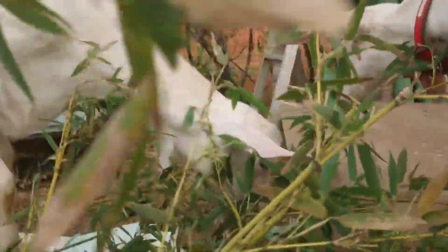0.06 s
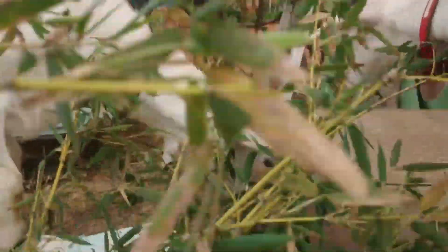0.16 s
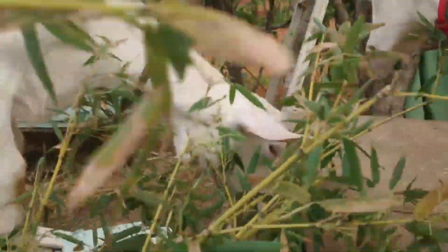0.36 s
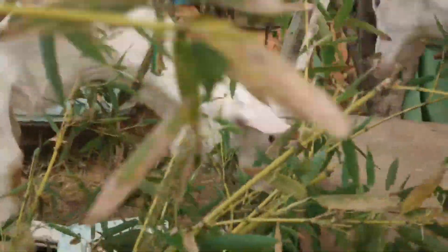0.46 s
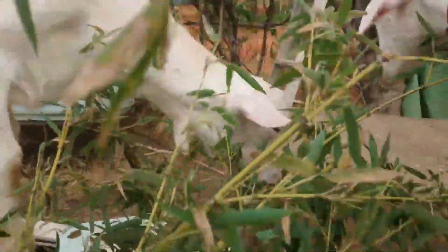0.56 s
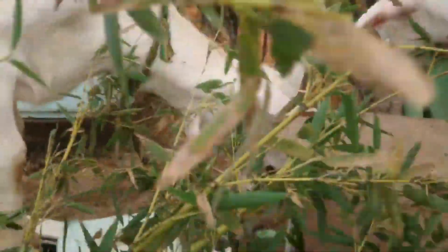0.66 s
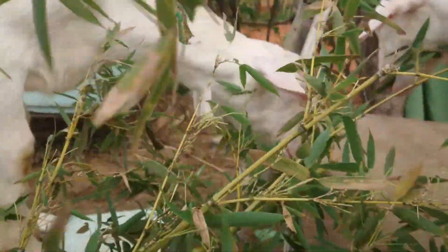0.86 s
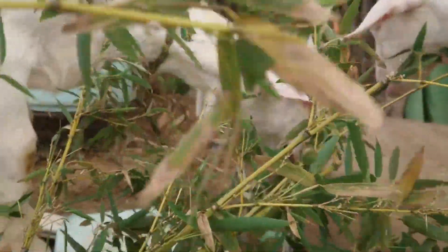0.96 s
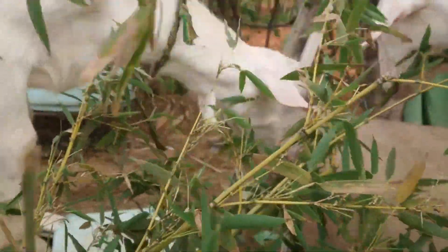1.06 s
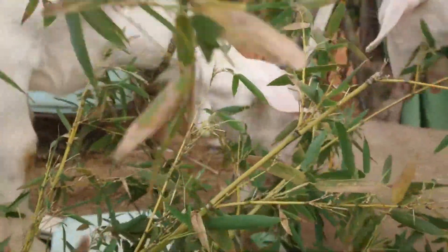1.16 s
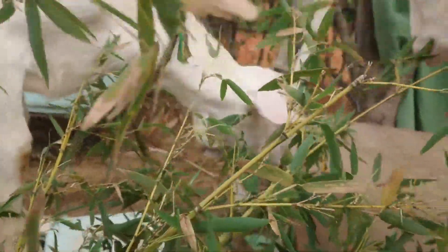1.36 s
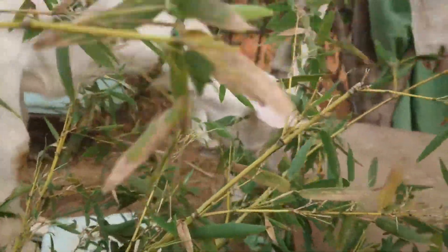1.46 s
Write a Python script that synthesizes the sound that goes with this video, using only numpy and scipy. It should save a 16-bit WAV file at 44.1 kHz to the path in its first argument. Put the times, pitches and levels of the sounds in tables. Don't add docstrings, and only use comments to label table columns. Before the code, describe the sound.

Bamboo leaves tear and rustle in uneven tugs, one thick stem cracking hard, over low outdoor rumble

```python
import sys
import numpy as np
from scipy import signal
from scipy.fft import rfft, irfft
from scipy.io import wavfile

SR = 44100
rng = np.random.default_rng(int(sys.argv[2]) if len(sys.argv) > 2 else 0)


def makeup_ratio(level_db):
    decades = np.asarray(level_db, float) / 20
    return 10 ** decades


def unload_audio(sound):
    columns = np.transpose(np.atleast_2d(sound))
    steps = np.round(np.clip(columns, -1, 1) * 32767)
    wavfile.write(sys.argv[1], SR, steps.astype(np.int16))


N = 66150

# hz, level_db
RUMBLE_COLOUR = [(15, -24), (25, -4), (71, 3), (273, -5), (337, -12.5), (743, -14), (1540, -13),
                 (1730, -13.5), (2500, -15.5), (3250, 2), (5500, -120)]
# hz, likeness_0_to_1
LIKENESS = [(60, 1), (300, 0.93), (700, 0.76), (1400, 0.13), (3000, 0.051), (8000, 0.02)]
# time_s, level_db
TUG = [(0, -45.5), (.2, -46), (.225, -42.5), (0.281, -37.5), (0.426, -38.5), (.47, -45), (0.612, -42.5),
       (0.666, -36), (0.701, -31.5), (0.744, -36), (0.782, -34), (0.848, -40.5), (.93, -44.5),
       (1.07, -45.5), (1.11, -41.5), (1.2, -47.5), (1.3, -45), (1.39, -47.5)]
# hz, level_db_per_hz
LEAF_COLOUR = [(200, 0), (400, -6), (800, -10), (1700, -11.5), (2500, -0.5), (5000, -2), (10000, -7),
               (16500, -7)]
# start_s, peak_db, colour_hz, brightness_db, t60_s
SNAPS = [(.2165, -25, 14600, -3, 0.0087), (.2303, -20, 9600, 9, 0.0092), (.2910, -12, 9000, 6.5, .014),
         (.525, -24.5, 8440, -13, 0.011), (.594, -28, 13000, -3.0, 0.013), (.6945, -14.5, 7900, 15, 0.016),
         (.867, -25, 14000, -4, 0.013), (.9045, -24.5, 2280, -12, 0.011), (.9695, -26.5, 7560, -2, .012),
         (1.003, -27.5, 4900, -14, 0.0092), (1.048, -32, 13000, 6, 0.0083), (1.0772, -38, 5040, -6, .008),
         (1.0920, -9, 9000, 20, 0.0052), (1.261, -36, 12000, 4.0, 0.022), (1.4117, -28, 3260, -3.5, 0.041),
         (1.425, -30, 13100, -7, 0.013)]
# start_s, peak_db, pitch_hz, t60_s
KNOCKS = [(0.229, -43.5, 210, 0.059), (0.289, -41.5, 246, 0.14), (0.4517, -11.5, 385, 0.018),
          (.4562, -19, 409.3, 0.12), (0.4626, -29, 454, 0.084), (.706, -28, 339, 0.075),
          (.7075, -32, 694, 0.15), (0.217, -32.5, 1510, 0.044), (0.24, -29.5, 1386, 0.035),
          (.905, -33.5, 563, 0.045), (.916, -35.5, 620, 0.029), (0.971, -38.5, 496, 0.018),
          (1.135, -37.5, 311, .05), (1.213, -40, 371, 0.066), (1.219, -40.5, 342, 0.047)]
# ratio_to_pitch, level_db, share_of_t60
STEM_MODES = [(.42, -12, 1.8), (.55, -10, 0.42), (1.0, 4.14, 0.82), (1.09, -3, 0.53), (1.6, -6.5, 0.51),
              (2.05, -1.5, 0.75), (3.0, -13, 0.27)]
# start_s, peak_db
CRACKS = [
    (.4514, -22),
    (0.4565, -15.5),
    (0.4595, -35),
]
# pitch_hz, level_db, t60_s
CRACK_MODES = [(1030, -7, 0.01), (1934, 1, 0.022), (2510, 7, 0.013), (2740, 9.5, 0.007), (3520, -6, 0.0069),
               (4040, -7, 0.01), (4360, -14, 0.012)]
# pitch_hz, level_db, t60_s
CREAK_MODES = [(1240, -26, 0.0079), (1460, -4, 0.017), (1614, -0.5, 0.053), (1710, 8, 0.0039),
               (2000, -2, 0.014), (2400, 6.5, 0.018), (2820, -9, 0.027)]
# delay_s, level_db
ECHOES = [(.004, -15), (.0091, -10), (0.0178, -12.5), (0.0271, -25)]
# hz, level_db
LEFT_PORT = [(300, 4.5), (1400, 2), (3000, -3.5), (5300, 0.6), (6300, -1.5), (8000, 4.5), (11300, 0.5),
             (14000, 7)]
# hz, level_db
RIGHT_PORT = [(300, -2.5), (3000, -3.65), (5200, 6), (5950, -4.5), (6800, -3), (9000, -10.5), (11000, -2.5),
              (15500, -7.5)]

CREAK_START_S = 1.316


def rms_one(x):
    return x / np.sqrt(np.mean(x ** 2) + 1e-20)


def at_hz(points, hz):
    table_hz, value = np.transpose(points)
    return np.interp(np.log(hz), np.log(table_hz), value)


def colour(x, points):
    hz = np.maximum(np.arange(N // 2 + 1) * SR / N, 1)
    return irfft(rfft(x) * makeup_ratio(at_hz(points, hz)), N)


def bandpass(x, order, low_hz, high_hz):
    return signal.sosfilt(signal.butter(order, [low_hz, high_hz], "band", fs=SR, output="sos"), x)


def highpass(x, order, hz):
    return signal.sosfilt(signal.butter(order, hz, "high", fs=SR, output="sos"), x)


def drift(rate_hz):
    r = np.exp(-40 * np.pi * rate_hz / SR)
    noise = rng.standard_normal(N // 20 + 4002)
    slow = signal.lfilter([1], [1, -2 * r, r * r], noise)[4000:]
    return np.interp(np.arange(N) / 20, np.arange(len(slow)), rms_one(slow - slow.mean()))


def click(start_s, db):
    out = np.zeros(N)
    out[int(start_s * SR)] = -makeup_ratio(db)
    return out


def ring(clicks, hz, t60_s):
    r, w = makeup_ratio(-60 / (t60_s * SR)), 2 * np.pi * hz / SR
    return signal.lfilter([0, np.sin(w)], [1, -2 * r * np.cos(w), r * r], clicks + 1e-18)


def ring_modes(clicks, modes):
    return sum(makeup_ratio(db) * ring(clicks, hz, t60_s) for hz, db, t60_s in modes)


def die_away(clicks, t60_s):
    return signal.lfilter([1], [1, -makeup_ratio(-60 / t60_s / SR)], clicks)


def bands(draw, low_hz, patchy_db):
    out, together = 0, drift(9)
    edges_hz = low_hz * 2 ** np.arange(0, np.log2(17000 / low_hz), .4)
    raw = [draw() for k in range(3)]
    for k, (low, high) in enumerate(zip(edges_hz, edges_hz[1:])):
        lead_in = np.tile(raw[k % 3], 2)[:, N // 2:]
        mid, side = bandpass(lead_in, 2, low, high)[:, -N:]
        alike = np.clip(at_hz(LIKENESS, np.sqrt(low * high)), 0, 1)
        flicker = makeup_ratio(patchy_db * (0.27 * together + 1.02 * drift(21.3)))
        out = out + flicker * (np.sqrt(1 + alike) * mid + np.sqrt(1 - alike) * side * [[1], [-1]])
    return out


def rumble():
    noise = bands(lambda: rng.standard_normal((2, N)), 25.8, patchy_db=3.05)
    return makeup_ratio(-46.5) * rms_one(colour(noise, RUMBLE_COLOUR + [(5000, -74)]))


def rustle():
    grains_per_s, grain_spread_db, clump_db, smooth_share = 3300, 4, 2, 0.66
    brighten_hz, brighten_share = 9000, 0.2
    tug_db = np.interp(np.arange(N) / SR, *np.transpose(TUG))
    swing_db = tug_db - tug_db.mean()
    chance = grains_per_s * makeup_ratio(.5 * swing_db + 4.0 * drift(60)) / SR

    def grains():
        size = makeup_ratio(grain_spread_db * np.minimum(rng.exponential(1, N), 5))
        size = size * (rng.random(N) < chance)
        return rng.standard_normal((2, N)) * (smooth_share + (1 - smooth_share) * rms_one(size))

    leaves = rms_one(colour(bands(grains, 302, clump_db), LEAF_COLOUR))
    top = colour(leaves, [(brighten_hz / 1.2, -30), (brighten_hz * 1.43, 0)])
    return makeup_ratio(tug_db + 1.5) * (leaves + (makeup_ratio(brighten_share * swing_db) - 1) * top)


def snaps():
    rise_share_of_t60, body_width_ratio, right_lag_samples = .07, 1.15, 14
    port_gain = makeup_ratio(np.array([[-.3], [.3]]))
    length = 1500
    out, t = np.zeros((2, N + 2000)), np.arange(length) / SR
    for start_s, db, hz, bright_db, t60_s in SNAPS:
        rise = 1 - np.exp(-(t / (rise_share_of_t60 * t60_s)) ** 2)
        shape = rise * makeup_ratio(-60 * t / max(t60_s, .002))
        shared = shape * rng.standard_normal(length) ** 3
        burst = 2.1 * shape * rng.standard_normal((2, length))
        burst = burst + np.array([shared, np.roll(shared, right_lag_samples)])
        edge = highpass(burst, 4, 2500)
        body = bandpass(burst, 2, hz / body_width_ratio, hz * body_width_ratio)
        burst = makeup_ratio(bright_db) * rms_one(edge) + rms_one(body)
        i = int(start_s * SR)
        out[:, i:i + length] += makeup_ratio(db + 1.0) * burst / np.abs(burst).max() * port_gain
    return out[:, :N]


def knocks():
    out = np.zeros(N)
    for start_s, db, hz, t60_s in KNOCKS:
        push = click(start_s, db - 8.5)
        out += ring_modes(push, [(hz * ratio, level_db, t60_s * share) for ratio, level_db, share in STEM_MODES])
    return bandpass(out, 1, 70, 1240)


def cracks():
    pushes = sum(click(start_s, db - 11.5) for start_s, db in CRACKS)
    grit = rng.standard_normal(N)
    splinter = makeup_ratio(7) * bandpass(grit * die_away(pushes, 0.025), 4, 500, 4200)
    shudder = makeup_ratio(2) * bandpass(grit * die_away(pushes, 0.37), 2, 180, 616)
    return ring_modes(pushes, CRACK_MODES) + splinter + shudder


def ping():
    return ring(click(CREAK_START_S, -23.5), 2860, t60_s=.022)


def creak():
    length_s, slips_per_s, jitter, level_db, fade_db = 0.063, 165, 0.29, -47, 10.5
    count = np.arange(int(length_s * slips_per_s))
    late_s = (count + jitter * rng.standard_normal(len(count))) / slips_per_s
    slips = sum(click(CREAK_START_S + a, level_db - fade_db * (a / length_s) ** 2) for a in late_s)
    slips = slips + 0.165 * rng.standard_normal(N) * signal.lfilter([1], [1, -.993], slips)
    return highpass(ring_modes(slips, CREAK_MODES), 2, 1000)


def echoes(x):
    dull = signal.lfilter([.4], [1, -.6], x)
    ports = []
    for port, stretch in zip(dull, (1, 1.065)):
        ports.append(sum(makeup_ratio(db) * np.roll(port, int(s * stretch * SR)) for s, db in ECHOES))
    return np.array(ports)


def scene():
    hits = snaps() + knocks() + cracks() + ping() + creak()
    return rumble() + rustle() + hits + echoes(hits)


def band_limit(x):
    return signal.sosfilt(signal.butter(12, 16980, fs=SR, output="sos"), x)


def record(dry):
    ports = np.array([colour(dry[0], LEFT_PORT), colour(dry[1], RIGHT_PORT)])
    ports = highpass(ports, 4, 48)
    mix = signal.sosfilt(signal.cheby2(20, 30, 15950, fs=SR, output="sos"), ports)
    return band_limit(mix)


dry = scene()
out = record(dry)
unload_audio(out)
```